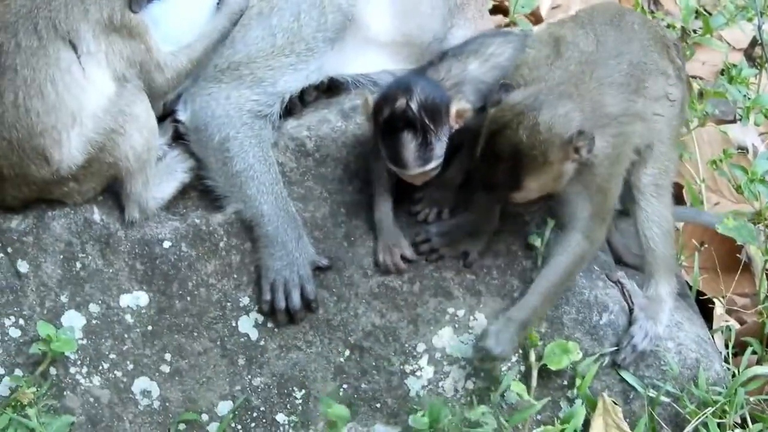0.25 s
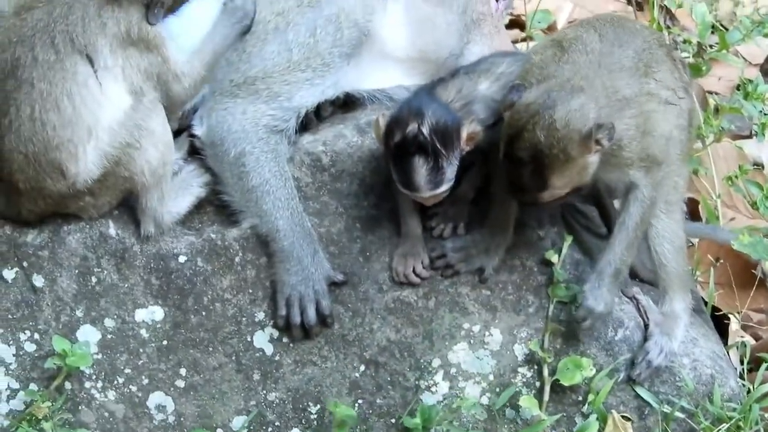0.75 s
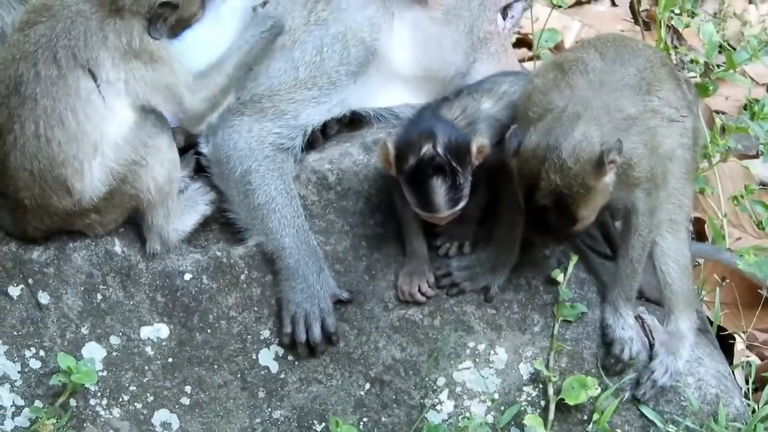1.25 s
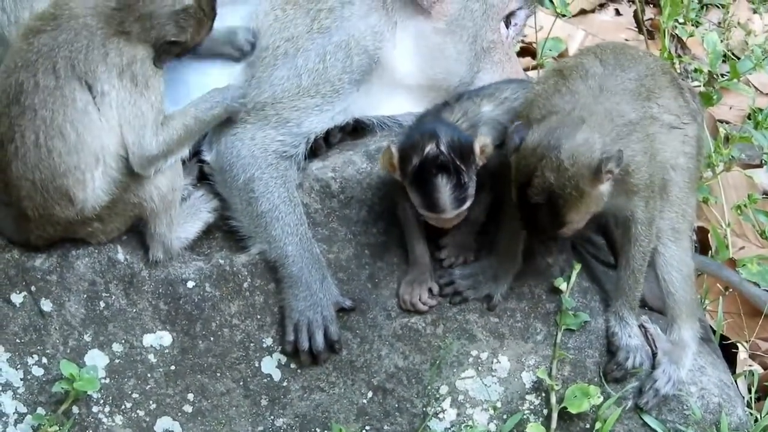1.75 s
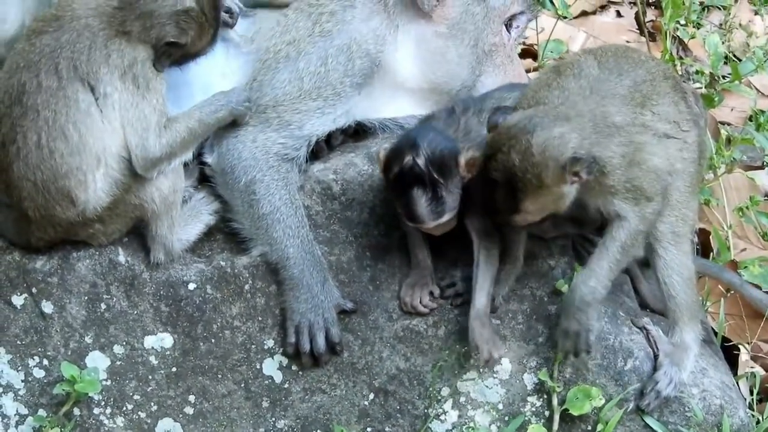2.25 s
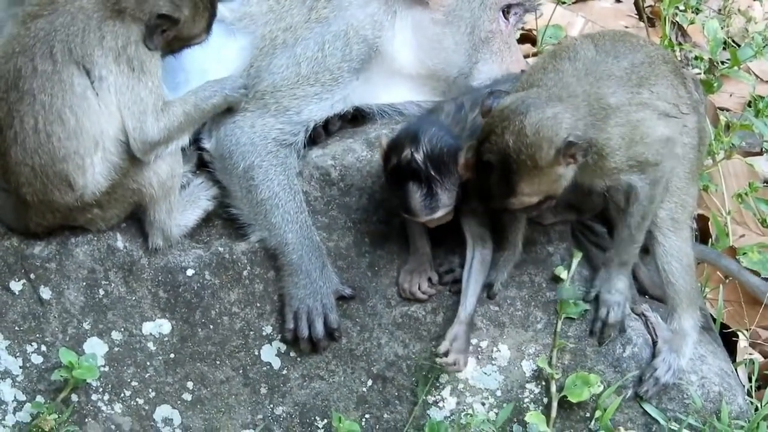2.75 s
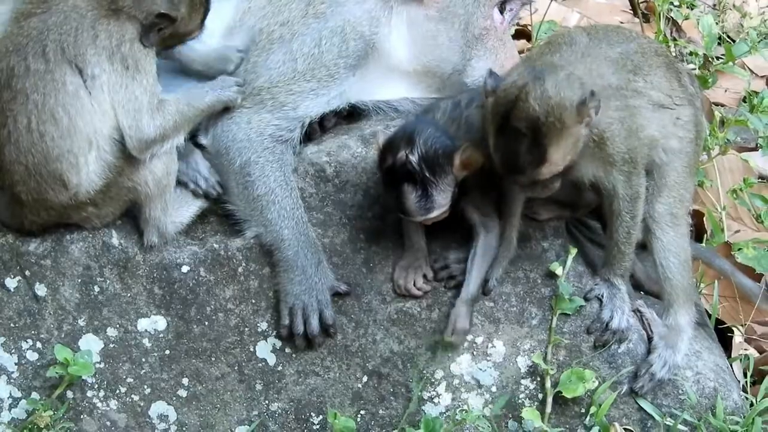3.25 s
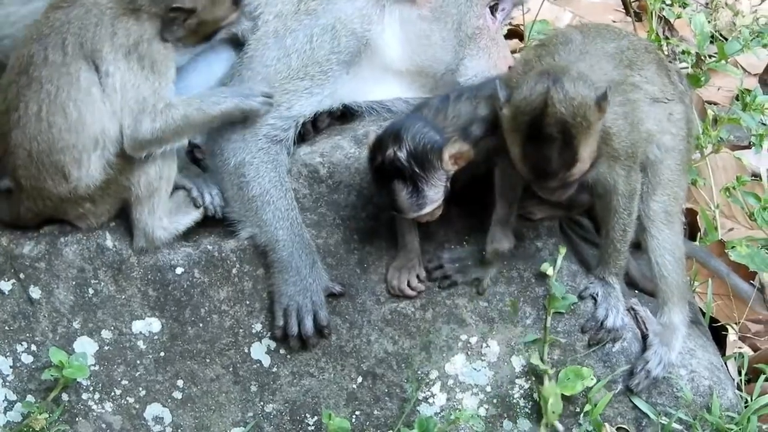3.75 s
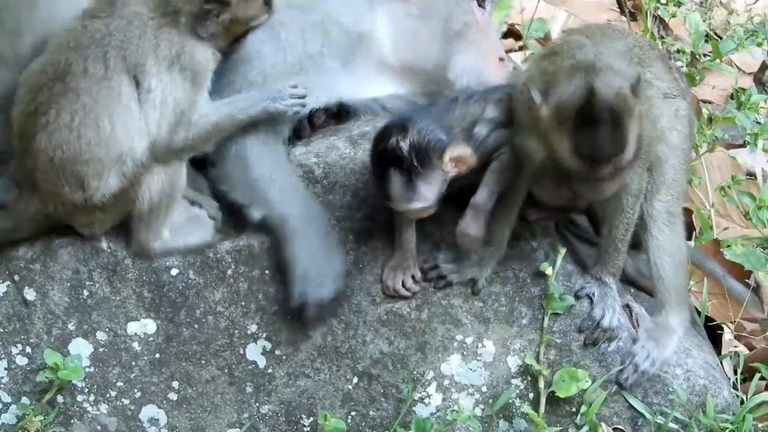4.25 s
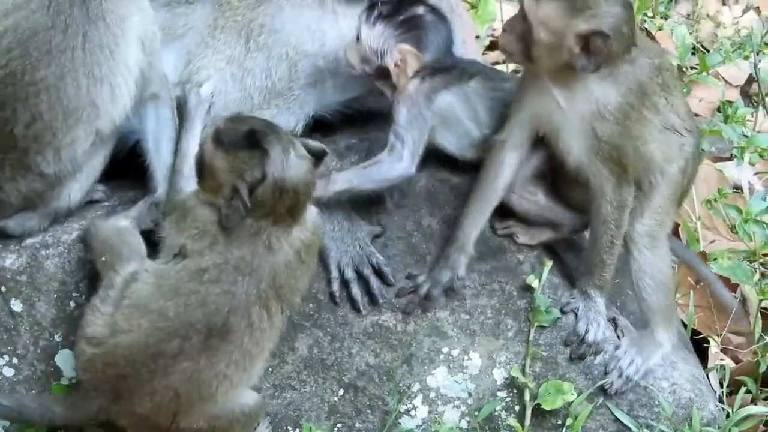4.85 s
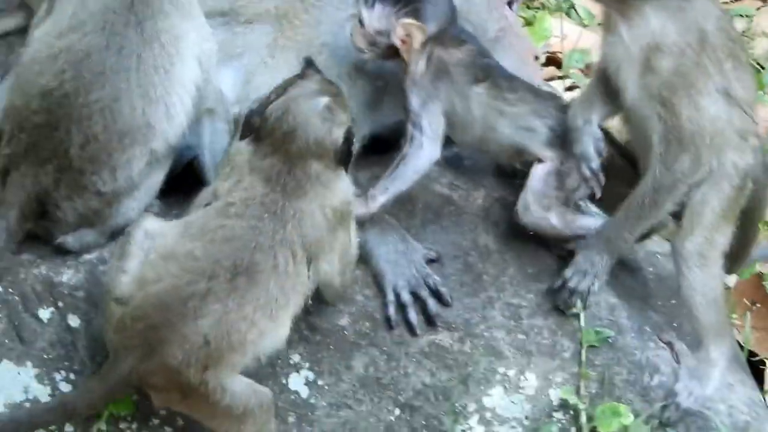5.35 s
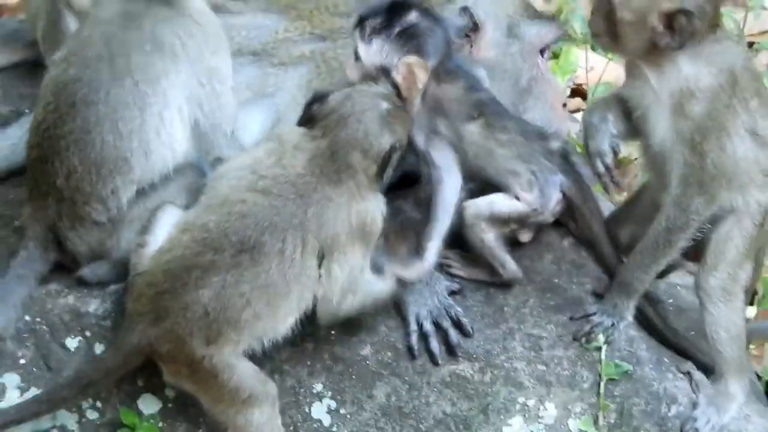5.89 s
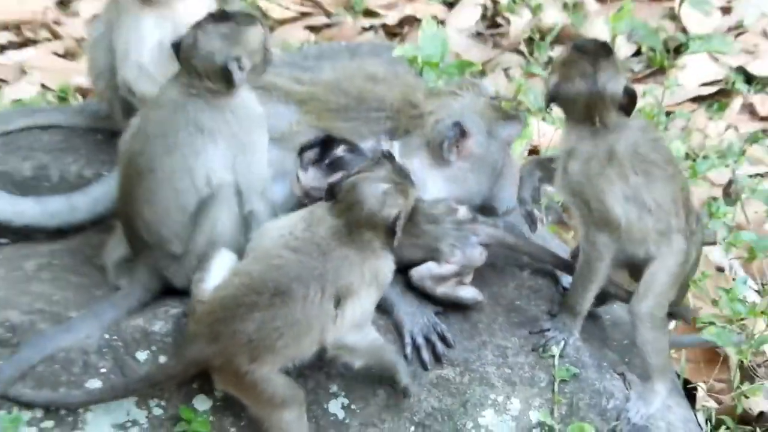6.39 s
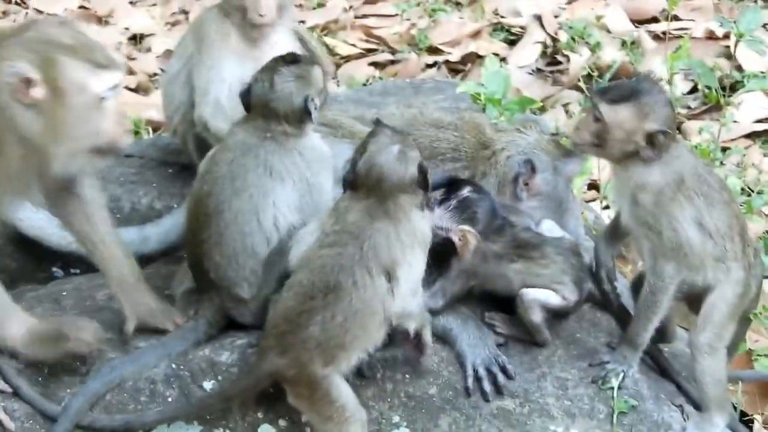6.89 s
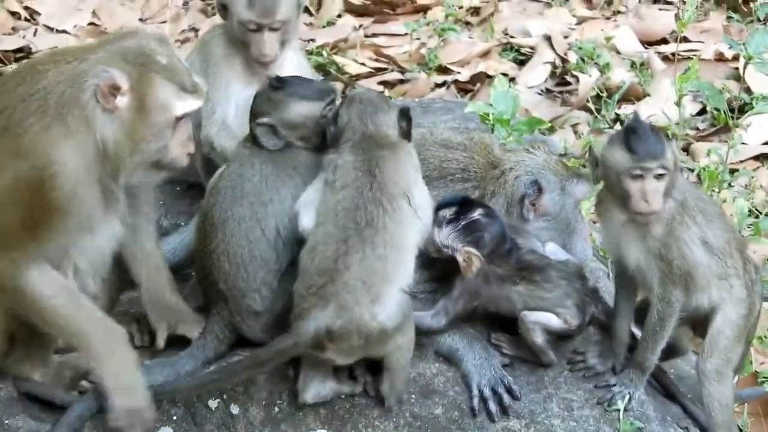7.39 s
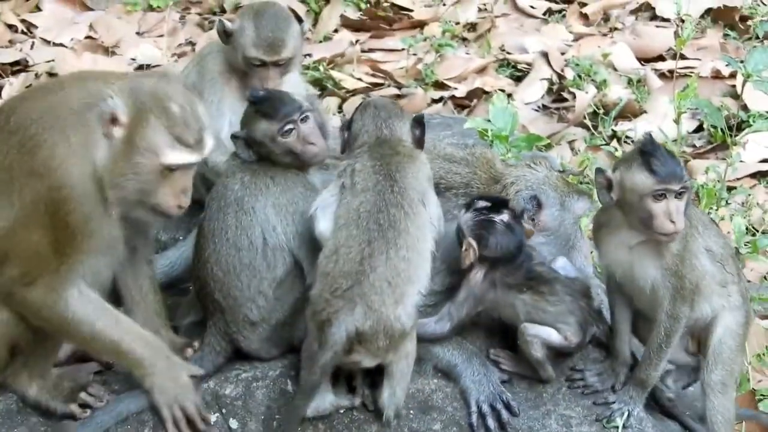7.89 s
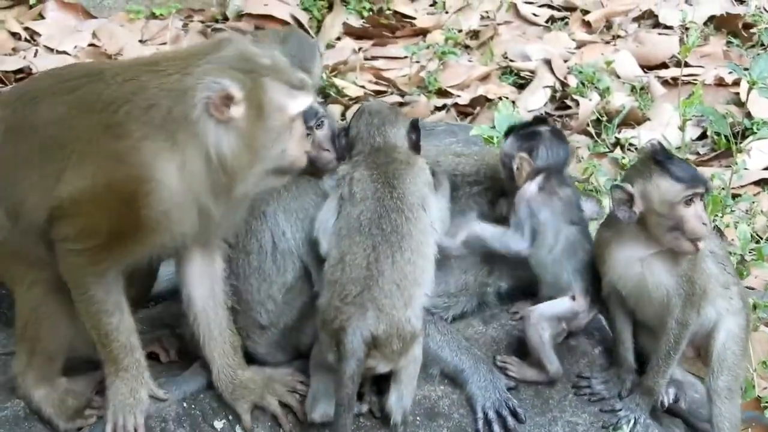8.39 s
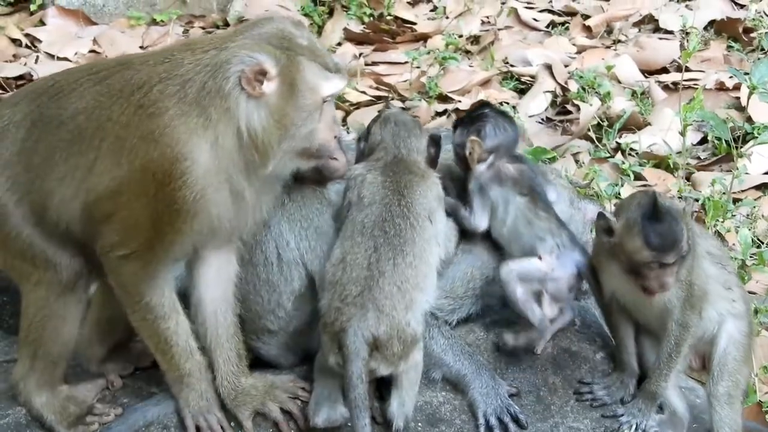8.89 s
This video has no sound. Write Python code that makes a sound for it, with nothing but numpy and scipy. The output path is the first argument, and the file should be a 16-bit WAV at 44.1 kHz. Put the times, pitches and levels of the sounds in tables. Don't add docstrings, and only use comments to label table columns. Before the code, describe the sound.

Shrill shimmering cicadas buzz throughout, with a bird whistle at the start, sharp twig snaps, leaf rustles and one thin monkey squeal.

```python
import sys
import numpy as np
from scipy import signal
from scipy.fft import rfft, irfft, next_fast_len
from scipy.io import wavfile
from scipy.ndimage import uniform_filter1d, map_coordinates

SR = 44100
rng = np.random.default_rng(int(sys.argv[2]) if len(sys.argv) > 2 else 0)


def ratio(d):
    e = np.asarray(d, float) / 20
    return 10 ** e


def file_out(sig):
    cols = np.atleast_2d(sig).T
    lim = np.clip(cols, -1, 1)
    pcm = np.round(lim * 32767).astype(np.int16)
    wavfile.write(sys.argv[1], SR, pcm)


N = 402633
BUCKLE_HZ = 542.7

# (time [s], strength [dB], left-right [dB])
CHORUS_COURSE = [(0, -42.5, 2), (1, -40.5, 0), (1.6, -39.5, 2.5), (2.6, -40.5, 0.5), (3.6, -39.5, 3.5),
                 (4.3, -41.5, 1.5), (4.65, -45, 3), (4.9, -42, -0.5), (5.8, -42.5, 2.5), (6.4, -43, 1.5),
                 (7.1, -44, 0.5), (7.6, -42, 1), (8.4, -44, 3.5), (9.13, -43.5, 0.5)]
# (time [s], level [dB])
LITTER_STIR = [(0, -59.5), (.7, -60.5), (1.1, -56), (2.3, -56.5), (3.4, -58), (3.85, -58.5), (4.15, -51),
               (4.5, -62), (5.3, -62.5), (6.6, -60), (7.3, -61), (7.85, -56.5), (8.3, -60.5), (9.13, -59.5)]


def unit(x):
    return x / np.sqrt(np.mean(x ** 2) + 1e-20)


def along(points, hz):
    f, v = np.transpose(points)
    return np.interp(np.log(hz + 1), np.log(f + 1), v)


def curves(rows):
    s, *cols = np.transpose(rows)
    return [np.interp(np.arange(N) / SR, s, c) for c in cols]


def wobble(rate):
    knots = rng.standard_normal(int(N * rate / SR) + 4)
    coarse = map_coordinates(knots, [np.arange(0, N + 64, 64) * rate / SR])
    return np.interp(np.arange(N), np.arange(len(coarse)) * 64, coarse)


def swells(rows):
    t = np.arange(0, N + 64, 64) / SR
    total_db = sum(db * np.exp(-.5 * ((t - s) / half) ** 2) for s, half, db in rows)
    return np.interp(np.arange(N) / SR, t, total_db)


def gate(t0, t1):
    t = np.arange(N) / SR
    return np.clip(np.minimum(t - t0, t1 - t) / 0.015 + 1, 0, 1)


def filtered(x, response):
    m = next_fast_len(x.shape[-1] + 8192)
    return irfft(rfft(x, m) * response(np.fft.rfftfreq(m, 1 / SR)), m)[..., :x.shape[-1]]


def pan(db):
    return ratio(np.array([db / 2, -db / 2]))


def rush(gain, patchy_db):
    # (frequency [Hz], left-right likeness [0-1])
    likeness = [(60, 0.84), (150, 0.99), (370, 0.63), (920, 0.76), (2300, 0.5), (5720, 0.35), (14200, 0.04)]
    z = signal.stft(rng.standard_normal((2, N)), nperseg=512)[2]
    field = uniform_filter1d(rng.standard_normal(z.shape[1:]), size=6, axis=0)
    field = uniform_filter1d(field, size=12, axis=1)
    pair = signal.istft(z * ratio(patchy_db * unit(field)), nperseg=512)[1][:, :N]

    def mid_side_gain(hz):
        turn = np.arccos(np.clip(along(likeness, hz), -1, 1)) / 2
        return gain(hz) * np.array([np.cos(turn), np.sin(turn)])

    mid, side = filtered(pair, mid_side_gain)
    return unit(np.array([mid + side, mid - side]))


def shaped_rush(db, spectrum, patchy_db):
    return ratio(db) * rush(lambda hz: ratio(along(spectrum, hz)), patchy_db)


def trees(x, t60, wet_db):
    t = np.arange(SR // 2) / SR
    tail = rng.standard_normal((2, len(t))) * ratio(-60 * t / t60) * (t > .008)
    tail = tail / np.linalg.norm(tail[0])
    return x + ratio(wet_db) * signal.fftconvolve(x.mean(0)[None], tail, axes=1)[:, :N]


def throb():
    # (crest time [s], crest number, depth [dB])
    crests = [(.19, 0, 2), (4.15, 11, 0.5), (6.2, 17, 4), (6.87, 19, 5), (8.95, 25, 7), (9.3, 26, 8)]
    crest, depth_db = curves(crests)
    return depth_db * np.cos(2 * np.pi * crest)


def far_rumble():
    # (frequency [Hz], density [dB per Hz])
    rumble_spectrum = [(12, -55), (20, -24), (51, -1), (102, 2.5), (177, 1.5), (261, -12.5), (336, -10),
                       (400, -16.5), (520, -19), (880, -120)]
    # (crest time [s], half length [s], swell [dB])
    gusts = [(.2, 0.059, 1), (.65, .2, -6.5), (.92, 0.047, 9.5), (1.45, 0.17, 8), (1.83, .1, -3.5),
             (2.3, 0.16, 9), (3.1, 0.22, 8.5), (4.16, 0.059, 13), (5.17, .12, 5), (7.0, 0.23, 6),
             (8.4, 0.57, 3)]
    db = -65 + swells(gusts) + 1.2 * wobble(5.9)
    return shaped_rush(db + 0.85, rumble_spectrum, patchy_db=1.9)


def stirred_leaves():
    # (frequency [Hz], density [dB per Hz])
    leaf_spectrum = [(150, -61), (250, -10.5), (339, -19), (483, -12.5), (961, -4), (1060, -2),
                     (2290, -3.5), (2450, 1), (3180, -17), (5390, -120)]
    stir_db, = curves(LITTER_STIR)
    return shaped_rush(stir_db + 1.93 * wobble(7.1) + 2.16, leaf_spectrum, patchy_db=3.25)


def broad_hiss():
    # (frequency [Hz], density [dB per Hz])
    hiss_spectrum = [(2000, -46), (2350, -13), (2600, -1), (2900, -4), (3400, -18), (4600, -15),
                     (5250, 4), (5600, 0), (6200, -9), (7350, -11), (7800, -6), (8300, -30), (11000, -70)]
    stir_db, = curves(LITTER_STIR)
    mean_db = stir_db.mean()
    db = mean_db + 3.5 + 0.75 * (stir_db - mean_db) + 1.4 * wobble(7.4)
    return shaped_rush(db + 9.05, hiss_spectrum, patchy_db=2.8)


def far_swarm():
    # (frequency [Hz], density [dB per Hz])
    swarm_spectrum = [(6800, -40), (7500, -8), (7950, 0), (8300, -1), (8550, -5), (9900, -13), (10600, -12),
                      (11000, -11), (11450, -16), (11800, -30), (12300, -60), (14200, -120)]
    chorus_db = curves(CHORUS_COURSE)[0]
    mean_db = chorus_db.mean()
    db = mean_db - 8 + 1.27 * (chorus_db - mean_db) + 0.25 * throb()
    return shaped_rush(db + 2.73, swarm_spectrum, patchy_db=3.2)


def other_insects():
    # (centre [Hz], width [Hz], rms level [dB])
    species = [(4220, 45, -64), (8690, 40, -57), (8430, 25, -63), (12040, 55, -63.5), (13520, 150, -64.5)]

    def bands(f):
        return sum(ratio(db) / np.sqrt(width) * np.exp(-.5 * ((f - hz) / width) ** 2)
                   for hz, width, db in species)

    total = np.linalg.norm(ratio([db for _, _, db in species]))
    return total * ratio(0.97 * throb()) * rush(bands, patchy_db=4.0)


def litter(bursts, side_db, grain_db):
    out = np.zeros((2, N + SR))
    for s, length, hz, width, db in bursts:
        n = round(length * SR)
        grain = np.repeat(rng.standard_normal(200), 150)[:n]
        crackle = rng.standard_normal((3, SR // 2))[:, :n] * ratio(grain_db * grain)
        shared, left, right = filtered(crackle, lambda f: np.exp(-.5 * (f / (.5 * width)) ** 2))
        carrier = np.sin(2 * np.pi * hz * np.arange(n) / SR)
        burst = unit(np.array([shared + .5 * left, shared + .5 * right]) * carrier)
        out[:, round(s * SR):][:, :n] += ratio(db) * burst * np.sqrt(np.hanning(n))
    return pan(side_db)[:, None] * out[:, :N]


def scuffles():
    # (start [s], length [s], centre [Hz], width [Hz], rms level [dB])
    hoarse_bursts = [(3.02, .15, 4150, 350, -54), (3.1, .18, 3750, 450, -49), (3.18, .25, 3400, 500, -53),
                     (3.42, 0.098, 1900, 690, -49), (4.09, 0.14, 1250, 1000, -48),
                     (4.1, 0.16, 3570, 750, -43), (.14, .14, 3630, 220, -54),
                     (7.55, 0.13, 1715, 400, -55.5), (7.72, 0.22, 1510, 550, -50.5),
                     (7.8, 0.099, 3300, 900, -52.5), (7.83, 0.21, 4230, 250, -54),
                     (7.86, 0.072, 1050, 81, -51), (8.06, .12, 1580, 720, -51.5),
                     (8.08, 0.092, 3300, 1100, -49), (8.45, 0.26, 3420, 360, -52),
                     (9.04, 0.11, 2300, 520, -63), (8.47, 0.26, 1650, 330, -56.5),
                     (2.05, 0.28, 640, 905, -58.5), (1.33, 0.13, 435, 120, -62),
                     (4.25, .41, 885, 700, -60.5)]
    return litter(hoarse_bursts, side_db=2.5, grain_db=2.0)


def dragged_leaves():
    # (start [s], length [s], centre [Hz], width [Hz], rms level [dB])
    hisses = [(3.52, 0.3, 8750, 1510, -38.5), (3.72, 0.2, 9170, 1600, -39), (3.8, .45, 7480, 5000, -48),
              (4.12, 0.15, 8900, 2000, -36.5), (4.79, 0.22, 9240, 2200, -46.5), (.87, .07, 9000, 1600, -39)]
    return litter(hisses, side_db=-7, grain_db=-2.5)


def twigs():
    # (time [s], peak level [dB], ring [Hz], left-right [dB])
    ticks = [(0.431, -41, 1144, 9), (0.876, -28, 1525, 10), (.878, -42.5, 710, 9), (1.26, -49, 1320, 14),
             (1.362, -43, 1470, -2.5), (2.522, -46.5, 1420, -6), (4.126, -37, 980, 0.5),
             (4.157, -29.5, 1030, 5), (5.414, -47, 2260, -3), (5.446, -50, 1270, -8), (5.831, -38, 1860, 3),
             (7.765, -122, 1410, -5), (8.61, -61, 1670, 4)]
    # (time [s], peak level [dB], ring [Hz], left-right [dB])
    snaps = [
        (0.8884, -30.5, 4480, 2.0),
        (5.8411, -34.5, 4300, 5),
        (0.8884, -29.5, 9300, -9),
    ]
    out, t = np.zeros((2, N + SR)), np.arange(SR // 20) / SR
    for s, db, hz, side_db in ticks + snaps:
        ring = np.sin(2 * np.pi * hz * t) * ratio(-60 * t / 0.013) * (1 - np.exp(-t / 0.00064))
        edge = filtered(rng.standard_normal(len(t)),
                        lambda f: np.exp(-.5 * (np.log(f / hz + 1e-9) / 0.24) ** 2))
        knock = ring + 0.33 * unit(edge) * ratio(-60 * t / 0.058)
        out[:, round(s * SR):][:, :len(t)] += pan(side_db)[:, None] * ratio(db + 5.5) * knock
    return out[:, :N]


def monkey():
    # (time [s], strongest overtone [Hz], level [dB], roughness [0-1])
    squeal = [
        (3.89, 3260, -49, 0.5),
        (3.92, 3326, -38, 0.65),
        (3.96, 3718, -34, 0.24),
        (4.059, 3666, -38, 0.22),
        (4.11, 3540, -45, 0.2),
        (4.13, 3550, -49, 0.4),
    ]
    # (multiple of the voice pitch, level [dB])
    throat = [(1, -33), (2, -26), (4, 1), (5, -27), (10, -18)]
    hz, db, rough = curves(squeal)
    rough = np.clip(rough, 0, 1)
    pitch = hz / 4 * (1 + .03 * rough * wobble(120))
    phase = 2 * np.pi * np.cumsum(pitch) / SR
    voice = sum(ratio(level) * np.sin(k * phase) for k, level in throat)
    loudness = gate(squeal[0][0], squeal[-1][0]) * ratio(db + 2.0 + 7.7 * rough * wobble(90))
    return pan(1.4)[:, None] * loudness * voice


def bird():
    # (time [s], pitch [Hz], level [dB])
    whistles = [
        [(0.0, 3697, -46.5), (0.1, 3644, -46), (0.125, 3500, -54), (0.145, 3340, -60)],
        [(0.16, 2300, -54), (.2, 2190, -47), (0.254, 2025, -45.5), (0.448, 2036, -50.5), (0.476, 2010, -67),
         (0.5, 2146, -70)],
        [(0.54, 1950, -69), (0.55, 2044, -66), (0.77, 2050, -67), (0.8, 2080, -69)],
        [(9.03, 2550, -58), (9.1, 2154, -50.5), (9.13, 2117, -38)],
    ]
    hz, level = np.zeros(N), np.zeros(N)
    for rows in whistles:
        pitch, db = curves(rows)
        on = gate(rows[0][0], rows[-1][0])
        hz = np.where(on > 0, pitch, hz)
        level = level + on * ratio(db)
    grain = ratio(2.0 + 4.3 * wobble(45.2))
    phase = 2 * np.pi * np.cumsum(hz * (1 + 0.0076 * wobble(90))) / SR
    return pan(3.8)[:, None] * level * grain * np.sin(phase)


def drumming_choir():
    # (multiple, level [dB])
    drum = [(4, -33), (5, -4), (6, -28), (7, -30), (8, -31), (9, -21), (10, 3.5), (11, -16), (12, -17),
            (13, -22), (14, -18), (15, -1.5), (16, -15), (17, -21), (18, -24), (19, -26), (20, -11.5),
            (21, -42)]
    count, spread, drift = 14, .0052, .002
    flutter_db, port_lag_s = 3.5, 2.8e-5
    size = 2 ** 15
    turn = np.arange(size) / size
    choir = np.zeros((2, N))
    lags = (-1) ** np.arange(count) * rng.uniform(0.53, 1.53, count)
    for detune, lag in zip(np.linspace(-1.7, 1.7, count), lags):
        cycle = sum(ratio(db + rng.normal(0, 1)) * np.sin(2 * np.pi * (k * turn + rng.random()))
                    for k, db in drum)
        rate = 1 + spread * detune + drift * wobble(18)
        place = (np.cumsum(rate) * (BUCKLE_HZ * size / SR)).astype(int)
        near = ratio(-3.8 * detune ** 2) * (1 + (ratio(flutter_db) - 1) * wobble(24))
        shift = round(.5 * lag * port_lag_s * BUCKLE_HZ * size)
        choir += near * [cycle[(place + shift) % size], cycle[(place - shift) % size]]
    return unit(choir)


def cicadas():
    # (multiple, level over the chorus [dB], left-right [dB], share of the throb,
    # flicker [dB])
    ribs = [
        (5, -8, 1, 0.0071, 3),
        (10, 0.8, -1.5, 0.042, 0),
        (15, -0.68, -1.9, 1, 1.2),
    ]
    # (time [s], swell [dB])
    low_step = [(0.182, 15), (.42, 9), (0.959, -14), (1.22, 11), (1.521, 14.5), (2.24, 7), (2.47, -11),
                (2.57, 7.5), (2.97, 7.5), (3.28, 7.5), (3.6, 11), (3.762, -9), (4.03, 14), (4.83, 12.5),
                (5.13, 7), (5.42, 10), (5.98, 11.5), (6.2, -15), (6.43, 7), (6.66, -24), (7.018, 12.5),
                (7.2, 7.5), (7.6, 6.5), (8.0, -53), (8.12, 4.5), (8.372, 14.5), (8.541, 15.5), (8.7, -7),
                (9.04, 10)]
    # (time [s], swell [dB])
    middle_step = [(.07, 4), (.18, -5.5), (.42, 6), (1.02, 5.5), (1.22, -2.5), (1.42, -9), (1.67, -10.5),
                   (1.87, 2.5), (2.17, 6), (2.64, 5.5), (2.75, -4), (3.02, -9), (3.33, -9), (3.46, 5.5),
                   (3.62, 5), (3.72, -4.5), (3.84, -9), (4.78, -6.5), (4.87, 6.5), (5.55, 7), (6.0, 4.5),
                   (6.66, 5), (7.03, -8), (7.73, 5), (7.88, -6.5), (8.11, 5), (8.24, -7), (8.32, 3.5),
                   (8.62, -4), (8.77, 7)]
    # (time [s], swell [dB])
    high_step = [(.35, 0), (.56, 0.5), (.69, -3), (1.12, -3), (1.22, 2), (1.42, -2.5), (1.62, 2),
                 (2.1, 1.5), (2.64, 7), (2.85, 0.5), (3.5, -4), (3.73, 2.5), (4.0, -4.5), (4.83, 2),
                 (5.42, -4.5), (5.82, 1.5), (6.2, -2), (6.87, 4), (7.22, -0.5), (7.55, 1.5), (8.6, 2.5)]
    step_s, settle = 0.028, round(.13 * SR)
    choir = drumming_choir()
    strength_db, place_db = curves(CHORUS_COURSE)
    out, rest = 0, choir
    for rib_row, steps in zip(ribs, (low_step, middle_step, high_step)):
        rib, rib_db, rib_side_db, share, flicker_db = rib_row
        db = strength_db + rib_db + share * throb() + flicker_db * wobble(17)
        db = db + swells([(s, step_s, swell) for s, swell in steps])
        side_db = place_db + rib_side_db + 1.3 * wobble(1.54)
        band = filtered(choir, lambda hz: abs(hz / BUCKLE_HZ - round(rib)) < .5)
        rest = rest - band
        slow = uniform_filter1d(uniform_filter1d(np.mean(band, 0) ** 2, settle), settle)
        out = out + ratio(db + 4.0) * pan(side_db) * band / np.sqrt(np.abs(slow) + 1e-12)
    swell_db = uniform_filter1d(db, round(.07 * SR))
    top = filtered(rest, lambda hz: hz > 15.5 * BUCKLE_HZ)
    weak = rest - top + top * ratio(1.35 * (swell_db - swell_db.mean()))
    return out + ratio(8.0 + strength_db) * weak


def scene():
    air = far_rumble() + stirred_leaves() + broad_hiss() + far_swarm()
    calls = trees(bird() + monkey() + scuffles(), t60=0.44, wet_db=-2.5)
    near = trees(twigs() + dragged_leaves(), t60=0.55, wet_db=-7)
    return cicadas() + other_insects() + air + calls + near


def band_limit(x):
    return signal.sosfilt(signal.butter(12, 14830, fs=SR, output="sos"), x)


def record(dry):
    # (frequency [Hz], response [dB])
    mic_response = [(100, 0), (11300, 0), (11800, -6), (13800, -8), (14600, -20), (15000, -40)]
    mix = filtered(dry, lambda hz: ratio(along(mic_response, hz)))
    return band_limit(mix)


dry = scene()
out = record(dry)
file_out(out)
```